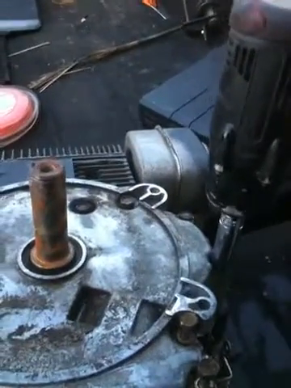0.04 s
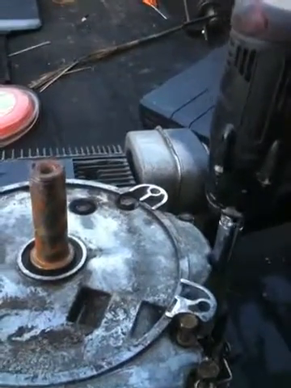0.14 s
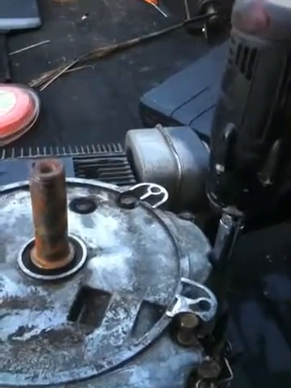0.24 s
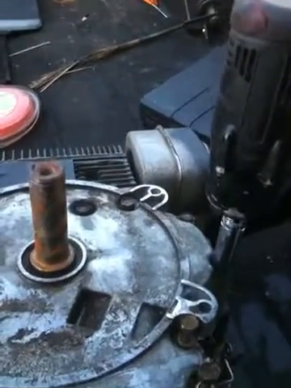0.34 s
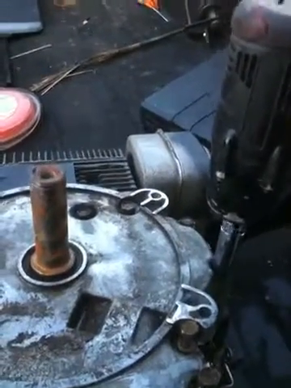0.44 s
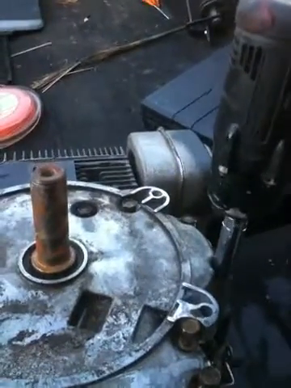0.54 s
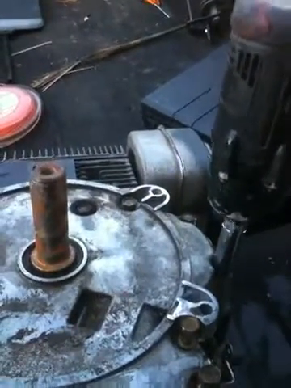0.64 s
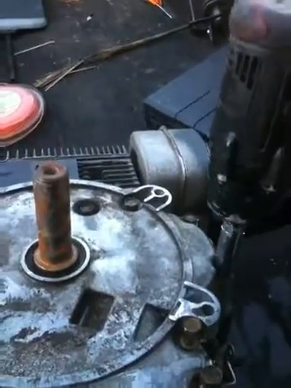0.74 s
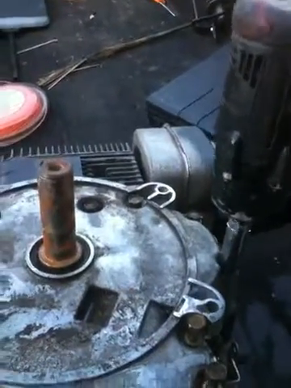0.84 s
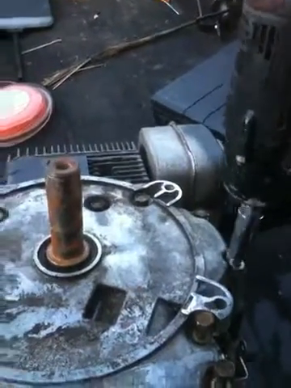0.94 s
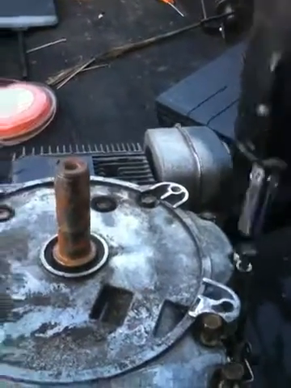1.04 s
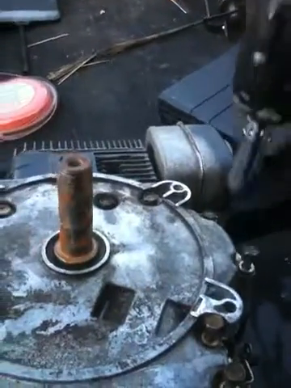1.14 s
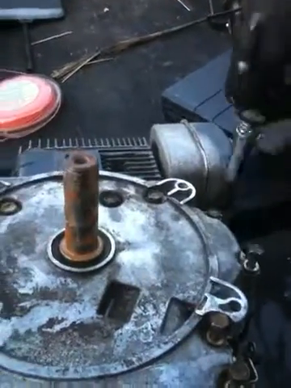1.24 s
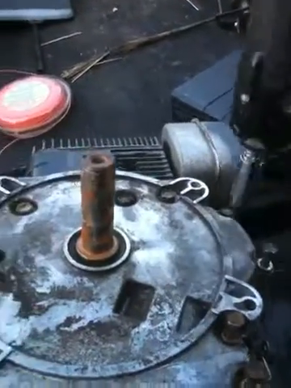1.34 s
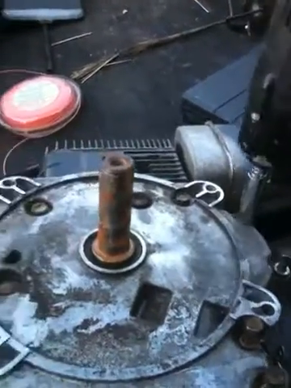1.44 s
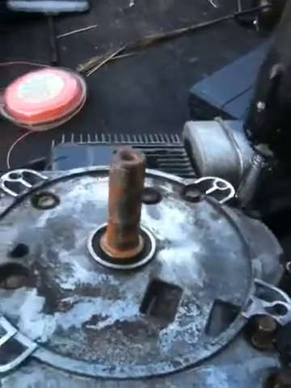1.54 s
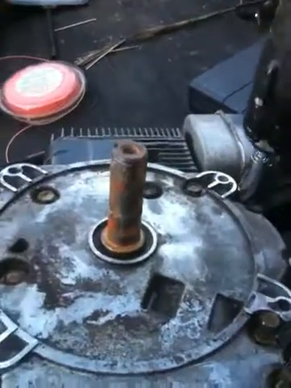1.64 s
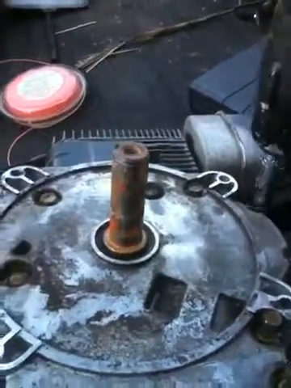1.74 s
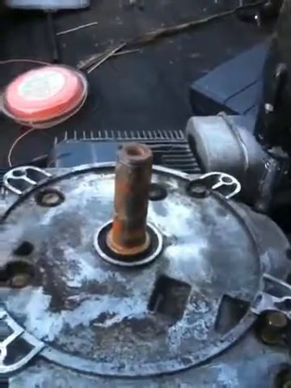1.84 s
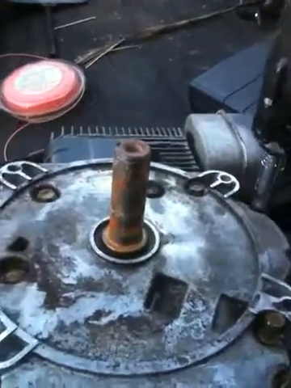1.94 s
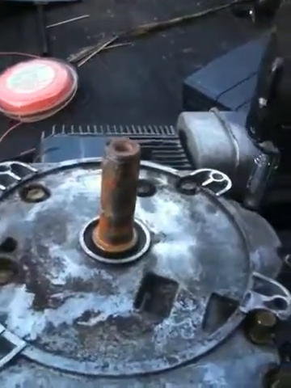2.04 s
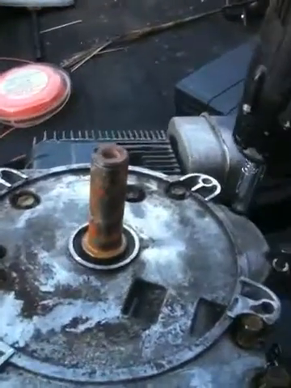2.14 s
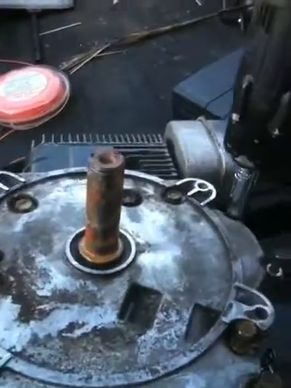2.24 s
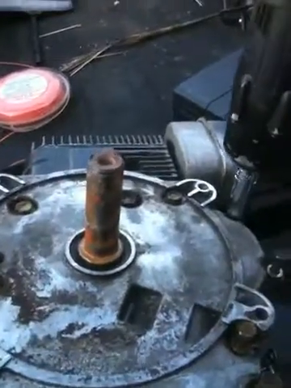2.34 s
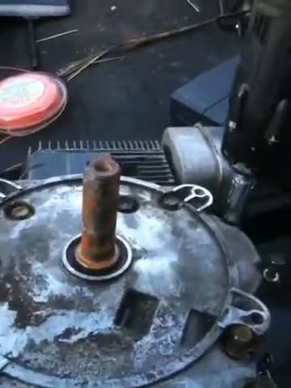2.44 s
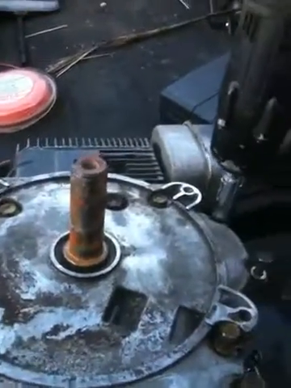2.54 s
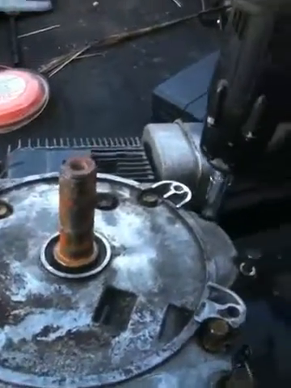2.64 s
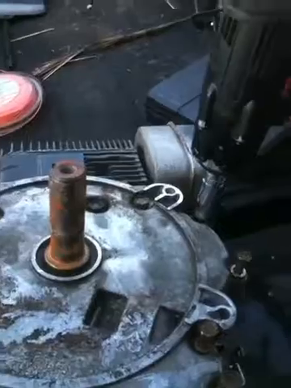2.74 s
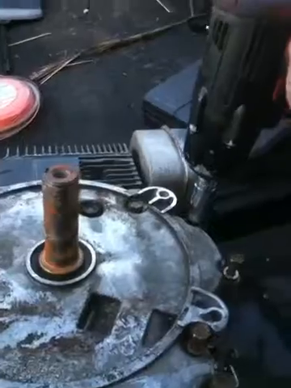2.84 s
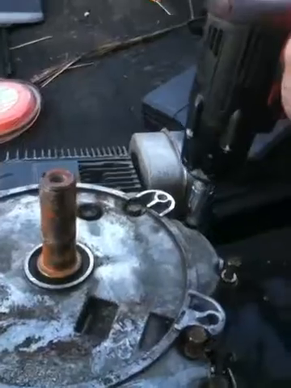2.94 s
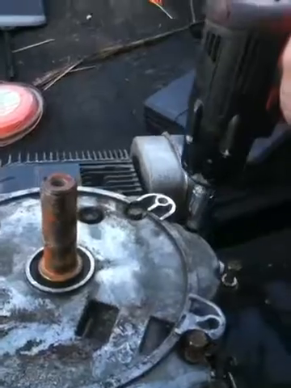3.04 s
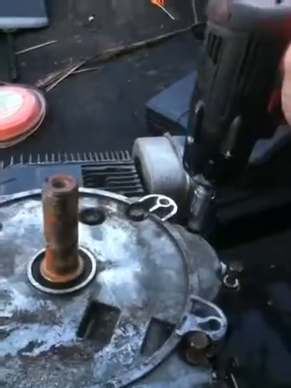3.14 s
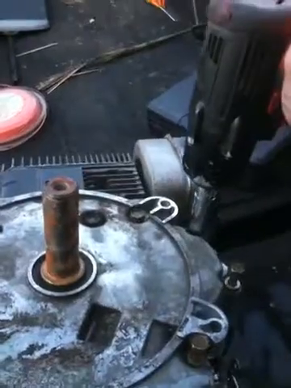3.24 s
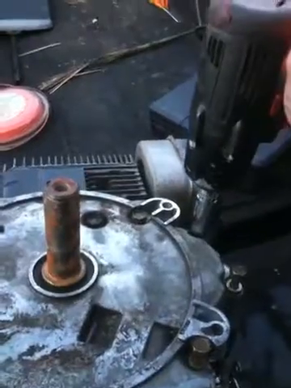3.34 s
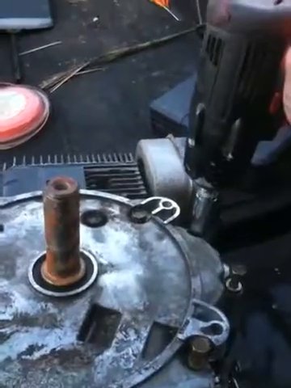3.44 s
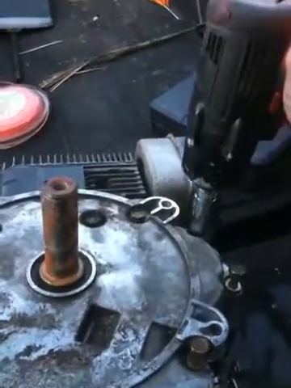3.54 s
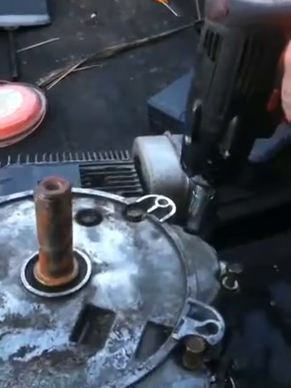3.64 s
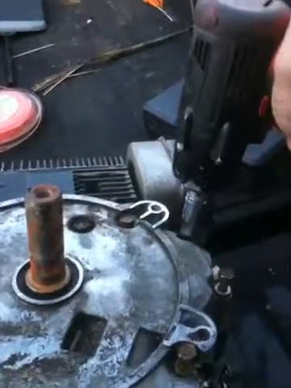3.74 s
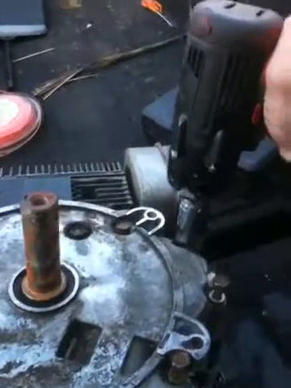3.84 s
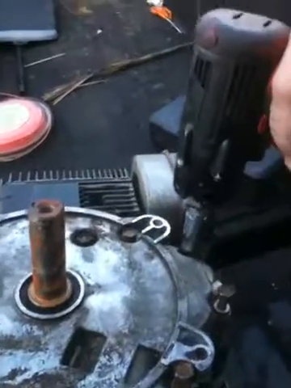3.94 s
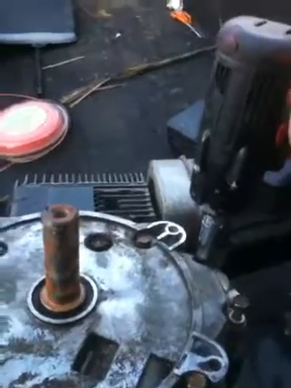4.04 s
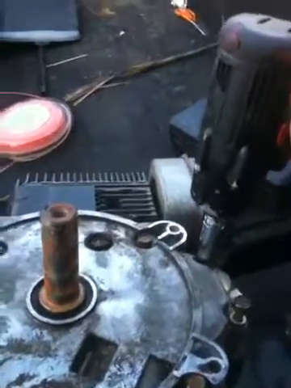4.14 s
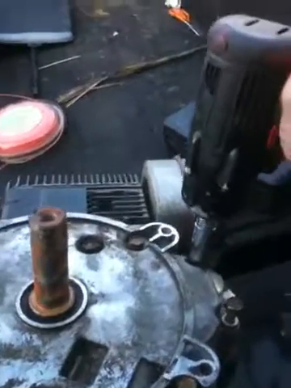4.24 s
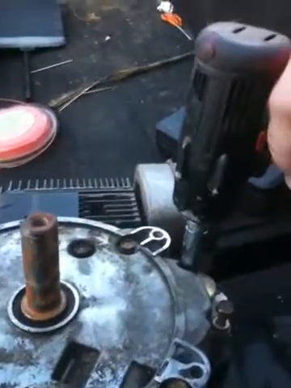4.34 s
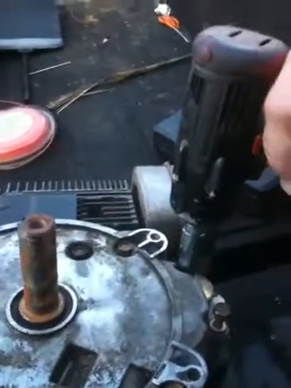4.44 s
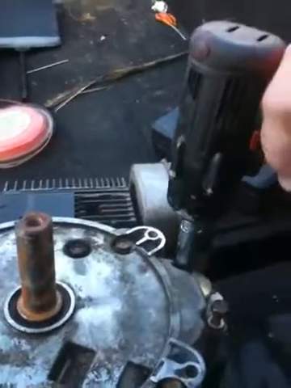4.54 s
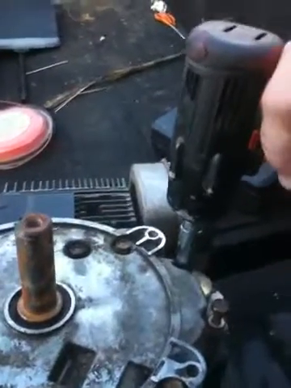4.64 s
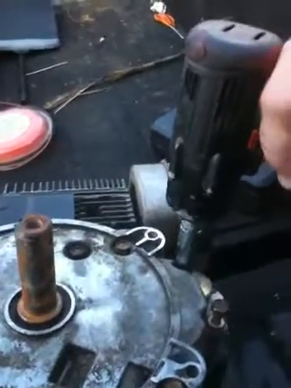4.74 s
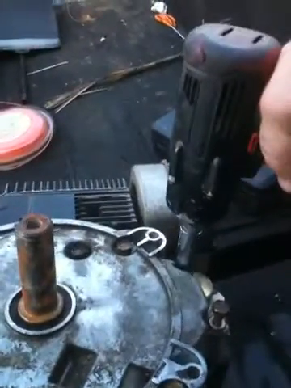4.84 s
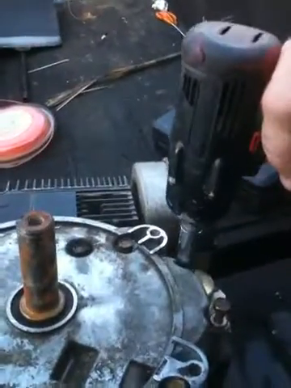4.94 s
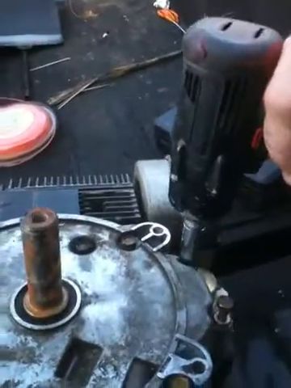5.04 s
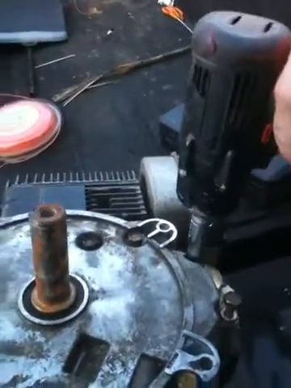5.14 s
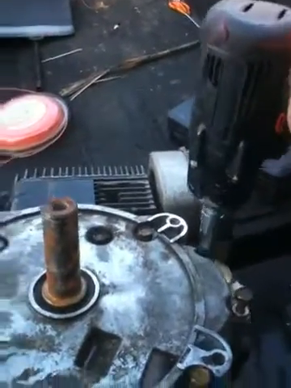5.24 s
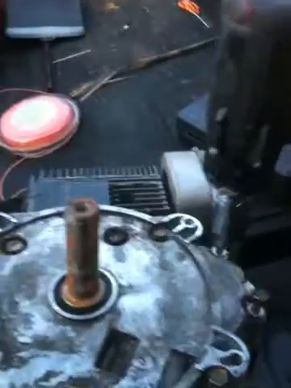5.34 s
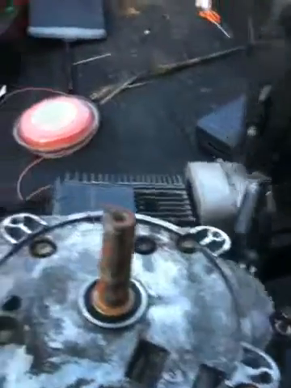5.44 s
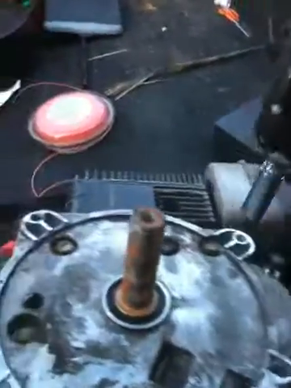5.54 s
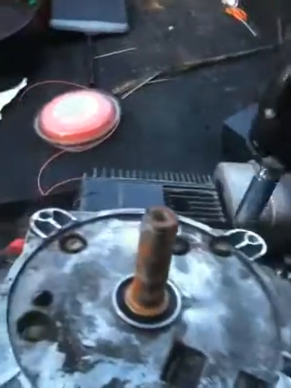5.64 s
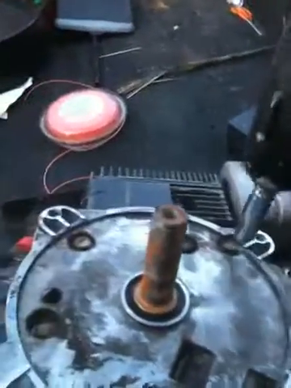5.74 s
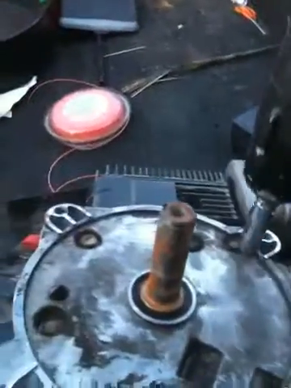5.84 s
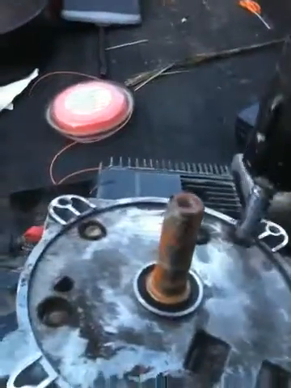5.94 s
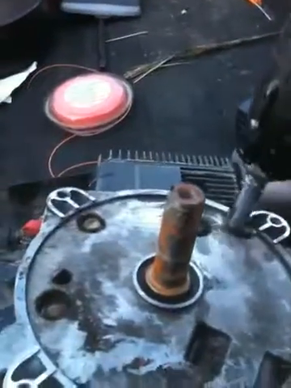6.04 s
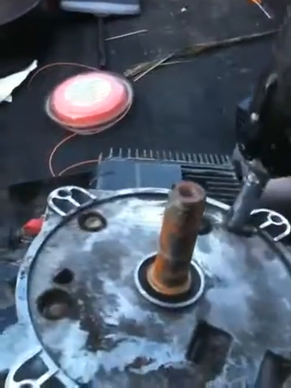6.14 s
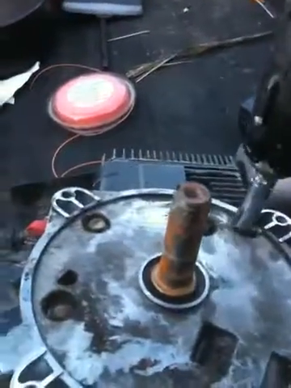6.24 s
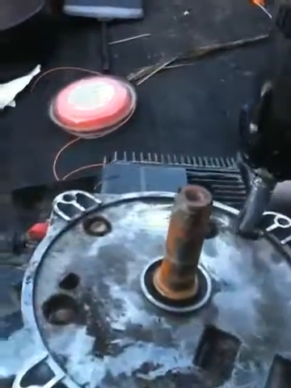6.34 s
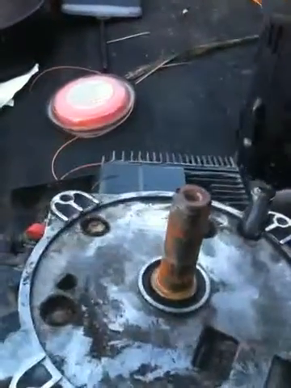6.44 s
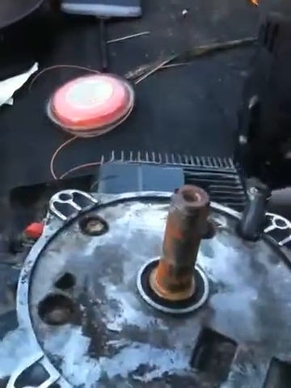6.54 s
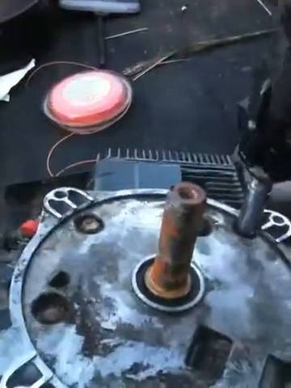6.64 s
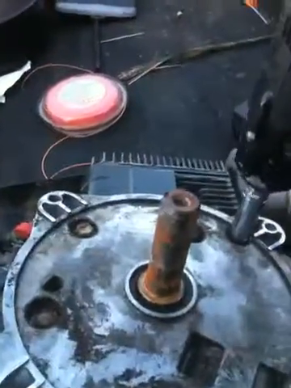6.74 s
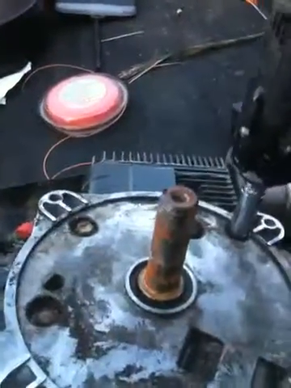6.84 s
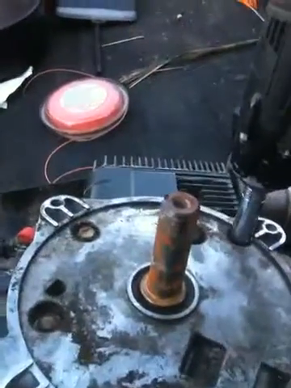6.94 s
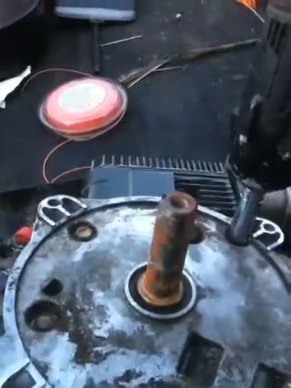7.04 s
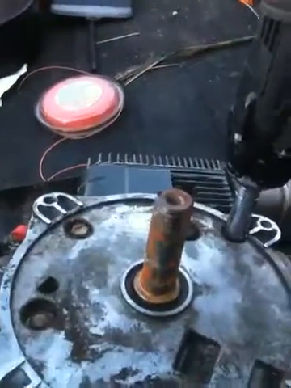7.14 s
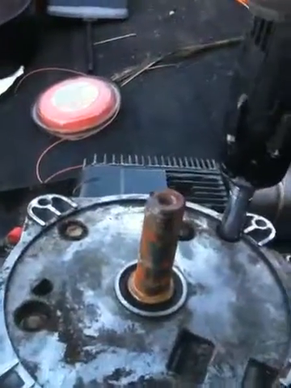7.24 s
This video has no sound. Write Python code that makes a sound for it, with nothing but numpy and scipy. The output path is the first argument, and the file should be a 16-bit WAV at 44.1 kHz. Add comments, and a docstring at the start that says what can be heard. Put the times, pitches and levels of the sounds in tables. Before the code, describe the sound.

Dense, ringing steel blows at over forty per second come in three bursts, each with bright clatter and gear whine. As a bolt lets go the blows slow and weaken while the whine climbs, then the brake snaps it downward. Scrapes and clacks of socket on metal fill the near-silent gaps. Close, distorted mono microphone, short room echo, faint low workshop hum.

```python
"""Hard, rapid metallic hammering comes in three bursts, with clacks between them, in a quiet workshop.
A cordless impact wrench backs out bolts: each blow is a set of ringing steel tones plus a noisy clatter.
When a bolt lets go, the motor spins free and its gears whine until the brake drags the pitch down;
the third burst is still hammering at the end. The clacks are short noise scrapes with a steel ring.
The close, loud tool overloads the microphone, and slow one-sided pushes stand for gusts from its fan."""
import sys
import numpy as np
from scipy import signal
from scipy.fft import rfft, irfft
from scipy.io import wavfile
from scipy.ndimage import uniform_filter1d

SR = 44100
rng = np.random.default_rng(int(sys.argv[2]) if len(sys.argv) > 2 else 0)


def wrap_up_sound(samples):
    """Save the sound to the file named by the first command line argument, as 16-bit audio."""
    columns = np.atleast_2d(samples).T
    # keep every value between -1 and 1, then stretch to whole-number steps
    tamed = np.clip(columns, -1, 1)
    steps = np.round(tamed * 32767).astype(np.int16)
    wavfile.write(sys.argv[1], SR, steps)


N = 321312
T = np.arange(N) / SR  # time in seconds

# Noise of the quiet workshop. Each row: frequency in Hz, relative level in dB per Hz.
SHOP_COLOUR = [(18, -95), (30, -64.5), (90, -15.5), (148, -2), (175, -12), (207, -9.5), (386, -21.5),
               (445, -14.5), (552, -27), (1000, -23.5), (2600, -33), (6600, -36.5), (9000, -43),
               (11700, -80.5), (19800, -120)]
# Machines far off. Each row: frequency in Hz, level in dB before it wavers.
FAR_MACHINES = [(119, -58), (150, -54), (201, -57), (447, -63)]
# Echo from the walls. Each row: lowest Hz, highest Hz, time to fall 60 dB in seconds, level in dB.
WALL_ECHO = [(247, 960, 0.49, -3.5), (1200, 6860, 0.15, -14)]
# Turbulence inside a gust. Each row: frequency in Hz, relative level in dB per Hz.
GUST_COLOUR = [(60, -7.5), (170, -1.5), (400, -10.5), (1000, -21.5), (3000, -50)]
# Gusts from the fan on the microphone. Each row: start in seconds, push in dB before turbulence.
FAN_GUSTS = [(.022, 9.5), (.194, 4.5), (.347, 6.5), (2.262, 10), (2.622, 3), (2.71, 2), (2.86, -3),
             (3.008, 5.5), (3.26, 0), (3.754, 6.5), (3.857, 5.5), (4.272, 0), (6.946, -4)]
# Ringing tones of socket, anvil and casting.
# Each row: frequency in Hz, relative level in dB, time to fall 60 dB in seconds before scaling.
STEEL_TONES = [(990, -26, .16), (1950, -14.5, 0.074), (2170, -25.5, 0.066), (2590, -10.5, 0.028),
               (4140, -10, 0.034), (4900, -10, .06), (5790, -6, 0.12), (6556, -2.5, 0.052),
               (6940, -1.5, .05), (7070, -4.5, 0.095), (7230, -4, 0.081), (7160, -4.5, .05),
               (8300, -25.5, .05), (8970, -11, 0.084)]
# The ring turns duller or brighter over time.
# Each row: time in seconds, dB added to the tones under 6 kHz and taken from those above.
RING_BALANCE = [(0, -0.5), (2.2, -5), (3.7, -7.5), (4.0, 2.5), (6.0, 1), (6.7, -4.5), (7.1, 1)]
# Broad clatter of steel on steel. Each row: frequency in Hz, relative level in dB per Hz.
CLATTER_COLOUR = [(350, -27.5), (600, -15.5), (1780, -14.5), (1910, -13), (2990, -9.5), (3240, -7),
                  (3710, -9.5), (4370, -5), (7040, 0), (9500, -8.5), (15500, -22)]
# The dull knock of the casting. Each row: frequency in Hz, relative level in dB per Hz.
CASTING_COLOUR = [(150, -5), (450, -5.5), (1400, -13), (2400, -3), (4000, -23.5)]
# Metal clacks, and the first blows of the second and third bursts.
# Each row: start in seconds, relative strength in dB, brightest pitch in Hz, scrape length in ms.
METAL_CLACKS = [ (1.048, -18.5, 7200, 2.7), (1.07, -27, 7300, 1), (1.082, -32, 7250, 1),
                (1.094, -30, 7280, 1), (1.104, -33, 7250, 1), (1.467, 1.5, 4360, 5.3),
                (1.551, -27, 5500, 1), (1.617, 3, 6750, 6), (1.692, -23, 5450, 1.1), (1.723, -26, 6190, 1),
                (1.769, -33, 4400, 1.5), (1.79, -39, 6500, 4), (1.819, -32, 6300, .74),
                (1.905, -24, 3000, 6), (1.916, -14, 8850, .6), (1.937, -33, 3500, 3), (1.958, -33, 4500, 4),
                (2.121, -29.5, 6880, 3), (2.131, -22, 2470, 2.6), (2.145, 4, 6300, 7),
                (5.393, -14.5, 7460, 6.2), (5.447, -28, 6970, 1), (5.477, -24, 7600, 1.2),
                (5.497, -22, 7400, 1), (5.523, -26.5, 7400, .6), (5.907, -1, 7240, 3.3),
                (5.94, -25, 2170, 2), (6.006, -1.5, 6240, 10), (6.136, -35, 8020, 1), (6.185, -32, 6900, 3),
                (6.213, -40, 2600, 3), (6.245, -41, 2600, 3), (6.443, -4, 7070, 2), (6.484, -32, 5330, 2.5),
                (6.515, -38, 2730, 2.2), (6.59, -34, 2550, 1.3), (6.609, -33, 6890, 2),
                (6.635, -28, 3600, 28), (6.666, -4, 5500, 3), (6.686, -3, 2800, 12)]
# Extra pitches in the gear whine. Each row: multiple of the tooth rate, dB relative to it before wavering.
WHINE_ORDERS = [(1 / 3, -25), (2 / 3, -26)]
# Each row is a burst: trigger pulled in seconds, bolt free in seconds, trigger let go in seconds,
# dB added to the whine while the hammer strikes.
BURSTS = [(-1, .77, .936, -4), (2.145, 5.03, 5.328, -3), (6.666, 7.3, 8, 4)]
# Motor speed, rising as each bolt loosens. Each row: time in seconds, tooth rate of the gears in Hz.
MOTOR_SPEED = [(0, 4510), (.55, 4540), (.63, 4850), (.72, 5220), (.79, 5620), (.935, 5745), (2.2, 4200),
               (2.8, 4300), (4.3, 4500), (4.75, 4600), (4.9, 4850), (5.0, 5320), (5.06, 5630), (5.2, 5745),
               (5.33, 5780), (6.72, 4350), (6.87, 4490), (7.0, 4560), (7.1, 4950), (7.29, 5700)]
# What follows the speed: a looser bolt takes fewer, weaker blows and lets the gears sing.
# Each row: tooth rate in Hz, blows per second at full spin, blow level in dB, running noise in dB,
# whine in dB, hum in dB relative to the blow.
SPEED_LAWS = [(4250, 46.3, -2, -3, -25, -20), (4430, 46.4, -3, -4, -22, -12),
              (4500, 44.5, -1, -4.5, -11, -15), (4560, 40, 1, -5.5, -10, -15), (4800, 32, 0, -7, -7, -15),
              (5250, 27, -6, -9, -5, -30), (5600, 25, -9, -9, -4.5, -40), (5760, 24, -12, -10.5, -2, -40)]
# The brake changes the whine. Each row: seconds after letting go, dB added to whine, dB added to octave.
BRAKE_FADE = [(0, 0, 0), (.008, -10, -8), (.024, -11, 10), (.033, -28, 14), (.042, -30, 5)]

SHOP_DB = -48.5  # before a slow drift
DRAUGHT_DB = -19  # the fan's buffeting, relative to the running noise
RUMBLE_DB = -20.5  # shaking from the blows, relative to the blow level
PUFF_MS, PUFF_MS_PER_DB = 11, .3  # length of a 0 dB gust; stronger gusts last longer
CLACK_T60_S, T60_S_PER_DB = .042, .0006  # base decay of a 0 dB clack; quieter ones die sooner
STOP_S, STOP_HZ, STOP_DB = 0.97, 191, -10.5  # the tool's body thuds once as the brake bites
HUM_ORDER = .735  # pitch of the rough hum, as a share of the tooth rate
OCTAVE_DB = -25  # the octave of the whine, before braking
SPIN_UP_S, SPIN_UP_DB = .07, -30  # the running noise climbs from this far down
FIRST_GAP = .7  # blow rate as the motor starts, share of the running rate
FIRST_BLOW_DB = -12  # the blows gather strength as the motor spins up
LAST_BLOW_DB_PER_S = 1000  # the blows drop away once the bolt is free
BEAT_DB = 3  # whine and hum pulse with the blows, dipping between them by up to twice this
BRAKE_HZ_PER_S, BRAKE_S = 58000, .04  # the brake drags the pitch down, for this long
COAST_S, COAST_DB_PER_S = .025, 400  # wait after letting go, then the running noise dies
SURGE_HZ, SURGE_FROM_HZ, SURGE_TO_HZ = 95, 4600, 5620  # swing of the pitch with each blow, and where it acts
CAPSULE, BASS_CUT_HZ = 1.09, 700  # level where the capsule starts to flatten; bass cut after it
CEILING, LEAN = 0.67, .04  # amplifier clipping level and lopsidedness
TOP_HZ = 15714  # nothing much passes above this


def undb(db):
    """Turn decibels into a plain multiplier."""
    return 10 ** (np.asarray(db) / 20)


def unit(x):
    """Scale a signal to an average (RMS) level of 1."""
    return x / np.sqrt(np.mean(x ** 2))


def colour(x, table):
    """Shape a signal's spectrum by (Hz, dB) points."""
    hz, db = np.transpose(table)
    f = np.maximum(np.fft.rfftfreq(len(x), 1 / SR), 1)
    gain = undb(np.interp(np.log(f), np.log(hz), db))
    return irfft(rfft(x) * gain, len(x))


def band_pass(x, order, low_hz, high_hz):
    """Keep mainly the sound between two frequencies."""
    return signal.sosfilt(signal.butter(order, [low_hz, high_hz], "band", fs=SR, output="sos"), x)


def fade(x, t60):
    """Give every impulse an exponential tail that falls 60 dB in t60 seconds."""
    return signal.lfilter([1], [1, -np.exp(-np.log(1000) / (t60 * SR))], x)


def walk(rate):
    """Wander randomly: levels held 1 / rate seconds, smoothed twice, with a spread near 1."""
    k = int(SR / rate)
    steps = np.repeat(rng.standard_normal(N // k + 1), k)
    return 1.3 * uniform_filter1d(uniform_filter1d(steps, k), k)[:N]


def shop():
    """Quiet workshop: noise with a drifting level, and hums that waver a little."""
    noise = unit(colour(rng.standard_normal(N), SHOP_COLOUR)) * undb(SHOP_DB + 1.0 * walk(2))
    hums = 0
    for hz, db in FAR_MACHINES:
        hums = hums + undb(db + 2 * walk(6)) * np.sin(2 * np.pi * hz * T + walk(6))
    return noise + hums


def room(x):
    """Walls answer with a dull tail of fading noise, whose low part lasts longest."""
    echo, t = 0, np.arange(SR // 2) / SR
    for low_hz, high_hz, t60, db in WALL_ECHO:
        tail = band_pass(rng.standard_normal(len(t)), 3, low_hz, high_hz)
        # the echo builds up over 3.9 ms before it takes full effect
        shape = np.exp(-np.log(1000) * t / t60) * np.minimum(t / 0.0039, 1)
        echo = echo + undb(db) * tail * shape / np.sqrt(np.sum(shape ** 2))
    return signal.fftconvolve(x, echo)[:N]


def fan_air(run_db):
    """Faint buffeting from the fan: turbulent noise that follows the running level."""
    return unit(colour(rng.standard_normal(N), GUST_COLOUR)) * undb(run_db + DRAUGHT_DB)


def blow_rumble(blow_db):
    """The blows shake the microphone through bench and hand: low noise that follows their level."""
    rumble_colour = [(20, 0), (100, -11.5), (350, -5), (800, -19.5), (3000, -62.5)]  # (Hz, dB per Hz)
    noise = unit(colour(rng.standard_normal(N), rumble_colour))
    return noise * undb(blow_db + RUMBLE_DB + 3.4 * walk(25))


def fan_gusts():
    """Gusts from the vents shove the diaphragm to one side, with turbulence on top."""
    air = np.zeros(N)
    shove = 1 + 0.65 * unit(colour(rng.standard_normal(N), GUST_COLOUR))
    for start_s, db in FAN_GUSTS:
        length_ms = PUFF_MS + PUFF_MS_PER_DB * db
        progress = np.clip((T - start_s) * 1000 / length_ms, 0, 1)
        air = air + undb(db) * shove * np.sin(np.pi * progress) ** .5
    return air


def steel_ring(at, size, scatter_db, held):
    """Blows at the given samples ring every steel tone in a varying mix; held scales the ring time."""
    out = 0
    balance_db = np.interp(at / SR, *np.transpose(RING_BALANCE))
    for hz, db, t60 in STEEL_TONES:
        chance = rng.standard_normal((len(at), 2))  # random level and phase for each blow
        kicks = np.zeros(N, complex)
        lean_db = balance_db if hz < 6000 else -balance_db
        level = size * undb(db + lean_db + scatter_db * chance[:, 0])
        np.add.at(kicks, at, level * np.exp(2j * chance[:, 1]))
        # a complex one-pole filter is a decaying, rotating tone
        pole = np.exp((2j * np.pi * hz - np.log(1000) / (t60 * held)) / SR)
        out = out + signal.lfilter([1], [1, -pole], kicks).imag
    return out


def clacks():
    """Clacks and first blows: an uneven scrape, then a decay of bright noise, crack, knock and steel tones."""
    out, at, size = np.zeros(N), [], []
    t = np.arange(SR // 5) / SR
    for start_s, db, hz, scrape_ms in METAL_CLACKS:
        t60 = CLACK_T60_S + T60_S_PER_DB * db
        i, scrape = int(start_s * SR), max(scrape_ms, .2) / 1000
        rise = np.minimum(0.25 + 0.9 * t / scrape, 1) ** 1.3
        after = np.log(1000) * np.maximum(t - scrape, 0) / max(t60, .004)
        noise = rng.standard_normal((3, len(t)))
        # the scrape is uneven
        grain = undb(20 * uniform_filter1d(noise[2], size=60) * (t < 2 * scrape))
        bright = unit(signal.filtfilt(*signal.iirpeak(hz, 3.0, fs=SR), noise[0])) * np.exp(-after)
        # quieter clacks are given less top treble
        softened = colour(colour(noise[1], CLATTER_COLOUR), [(8500, 0), (14000, db / 3 - 11)])
        crack = undb(2.5) * unit(softened) * np.exp(-2.5 * after)
        # the dull knock builds up over 2 ms and dies more slowly
        knock = undb(-10.5) * unit(colour(noise[2], CASTING_COLOUR)) * np.exp(-.6 * after)
        knock = knock * np.minimum(t / 0.002, 1)
        out[i:i + len(t)] += undb(db - 9.5) * rise * grain * (bright + crack + knock)
        # three contacts at random moments within the scrape ring the steel
        at += list(i + (scrape * SR * rng.random(3)).astype(int))
        size += [undb(db - 30)] * 3
    return out + steel_ring(np.array(at), np.array(size), scatter_db=4, held=.5)


def brake_thud():
    """The tool's body thuds as the brake bites: one low, quickly dying sine."""
    since = np.maximum(T - STOP_S, 0)
    return undb(STOP_DB) * np.sin(2 * np.pi * STOP_HZ * since) * np.exp(-since / 0.0098)


def motor(blow_db, run_db, hz, whine_db, octave_db, hum_db):
    """Gear teeth whine at several pitches, a rough hum follows the blows, and gears and fan rush."""
    turn = 2 * np.pi * np.cumsum(hz * (1 + .004 * walk(200))) / SR  # phase of the tooth rate
    whine = np.sin(turn)
    for multiple, db in WHINE_ORDERS:
        whine = whine + undb(db + 1.5 * walk(60)) * np.sin(multiple * turn)
    whine = whine * undb(whine_db + 2.1 * walk(250))
    whine = whine + undb(octave_db + 3.0 * walk(120)) * np.sin(2 * turn)
    hum = undb(blow_db + hum_db + 2.5 * walk(46)) * np.sin(HUM_ORDER * turn + .85 * walk(200))
    rush = unit(colour(rng.standard_normal(N), CLATTER_COLOUR)) * undb(run_db + 1.9 * walk(40))
    return np.sqrt(2) * whine + hum + rush


def hammer(blows, blow_db):
    """Each blow rings the steel and sets off a clatter whose colour varies from blow to blow."""
    # a blow lands each time the running count passes a whole number
    at = np.flatnonzero(np.diff(np.floor(blows), prepend=0))
    size = undb(blow_db[at])
    jitter = (.0006 * SR * rng.standard_normal(len(at))).astype(int)
    at = np.clip(at + jitter, 0, N - 1)
    noise, clatter = unit(colour(rng.standard_normal(N), CLATTER_COLOUR)), 0
    # the socket also rattles at random, about 120 times a second
    rattle = (rng.random(N) < 120 / SR) * rng.exponential(1, N) * undb(blow_db - 4.5)
    for hz in 500 * 2 ** np.arange(0, 5.5, .5):
        kicks = np.zeros(N)
        kicks[at] = size * undb(2.2 * rng.standard_normal(len(at)))
        band = band_pass(noise, 2, hz / 2 ** 0.28, hz * 2 ** 0.22)
        t60 = 0.13 * (4000 / hz) ** 0.085  # the treble dies sooner
        clatter = clatter + band * (fade(kicks, t60) + fade(rattle, 0.01))
    return undb(3.5) * clatter + undb(-7.5) * steel_ring(at, size, scatter_db=4.0, held=1.1)


def tool():
    """The trigger and the motor speed set the blow count, the levels and the pitch of the gears."""
    speed = np.interp(T, *np.transpose(MOTOR_SPEED))
    law_hz, *laws = np.transpose(SPEED_LAWS)
    rate, blow, run, whine, hum = (np.interp(speed, law_hz, law) for law in laws)
    after, whine_add, octave_add = np.transpose(BRAKE_FADE)
    blows, hz, beat_db = np.zeros((3, N))
    blow_db, run_db, whine_db, octave_db = np.full((4, N), -120.)  # practically silent to begin with
    for pulled, free, let_go, loaded_db in BURSTS:
        on, off, striking = T >= pulled, T - let_go, T < free
        spin = np.clip((T - pulled) / SPIN_UP_S, 0, 1)
        blow_rate = rate * (FIRST_GAP + (1 - FIRST_GAP) * spin)
        # carry on from the blow count of the burst before
        blows[on] = (np.ceil(blows[-1]) + 1 + np.cumsum(blow_rate * on * striking) / SR)[on]
        blow_fall = LAST_BLOW_DB_PER_S * np.maximum(T - free, 0)
        blow_db[on] = (blow + FIRST_BLOW_DB * (1 - spin) ** 3 - blow_fall)[on]
        run_fall = COAST_DB_PER_S * np.maximum(off - COAST_S, 0)
        run_db[on] = (run + SPIN_UP_DB * (1 - spin ** 2) - run_fall)[on]
        beat_db[on] = (BEAT_DB * (np.cos(2 * np.pi * blows) - 1) * striking)[on]
        # the whine is set from full spin until the brake has done its work
        geared = (spin >= 1) & (off < BRAKE_S)
        hz[geared] = (speed - BRAKE_HZ_PER_S * np.maximum(off, 0))[geared]
        whine_db[geared] = (whine + loaded_db * striking + np.interp(off, after, whine_add))[geared]
        octave_db[geared] = (OCTAVE_DB + np.interp(off, after, octave_add))[geared]
    # as the bolt loosens, the motor surges in step with the blows
    loosening = np.clip((speed - SURGE_FROM_HZ) / (SURGE_TO_HZ - SURGE_FROM_HZ), 0, 1)
    swell = np.sin(np.pi * loosening) ** .4
    hz = hz + SURGE_HZ * swell * np.cos(2 * np.pi * blows)
    return blows, blow_db, run_db, (hz, whine_db + beat_db, octave_db, hum + beat_db)


def overload(x):
    """The capsule flattens first, so a gust mutes the treble; then the bass is cut and the amplifier clips."""
    flattened = x / np.sqrt(1 + (x / CAPSULE) ** 2)
    y = signal.lfilter(*signal.butter(1, BASS_CUT_HZ, "high", fs=SR), flattened)
    return CEILING * (np.tanh(y / CEILING + LEAN) - np.tanh(LEAN))


def scene():
    """Add tool, echo and air at the overloaded microphone, then the quiet workshop."""
    blows, blow_db, run_db, gears = tool()
    near = clacks() + brake_thud() + motor(blow_db, run_db, *gears) + hammer(blows, blow_db)
    air = fan_air(run_db) + blow_rumble(blow_db) + fan_gusts()
    heard = overload(near + room(near) + air) + shop()
    return np.array([heard, heard])


def record(dry):
    """One microphone on both channels, with the top cut off by a steep filter."""
    top_cut = signal.ellip(12, .2, 50, TOP_HZ, fs=SR, output="sos")
    return np.clip(signal.sosfilt(top_cut, dry), -1, 1)


dry = scene()
out = record(dry)
wrap_up_sound(out)
```